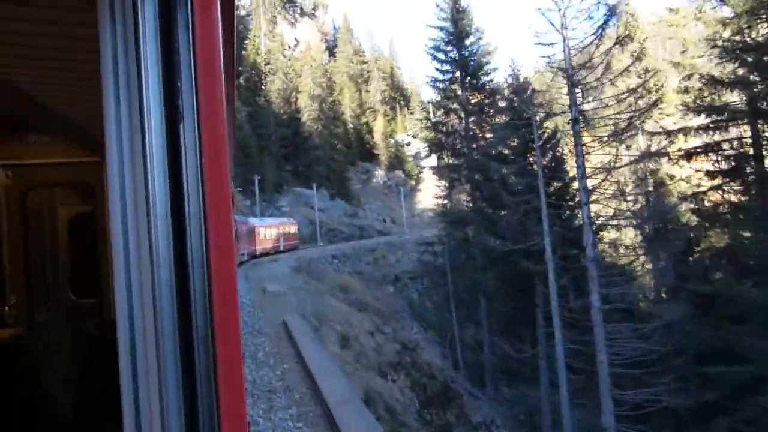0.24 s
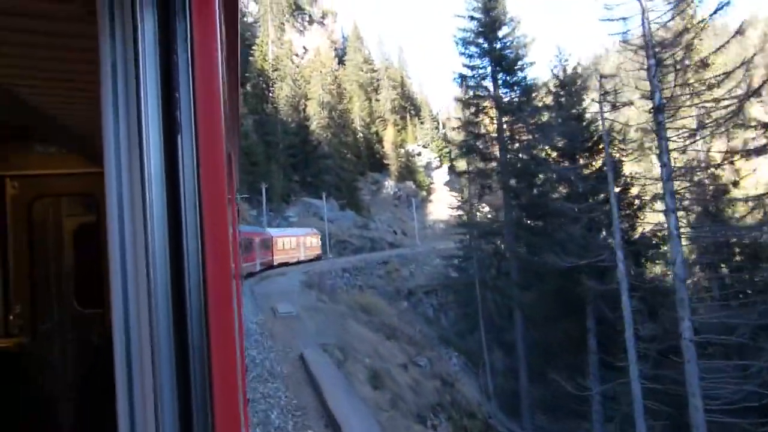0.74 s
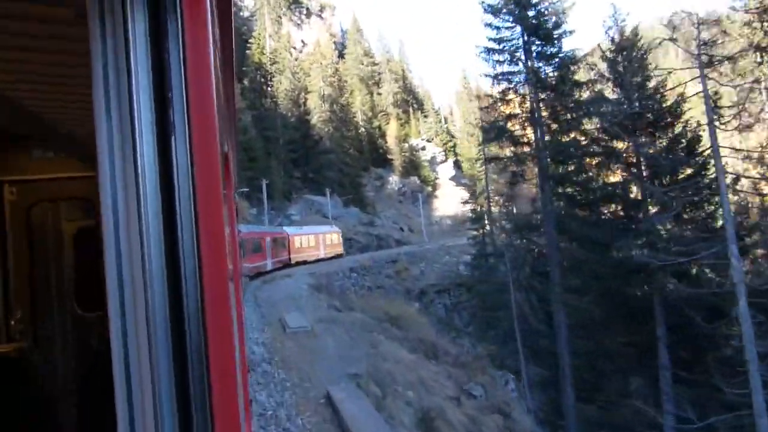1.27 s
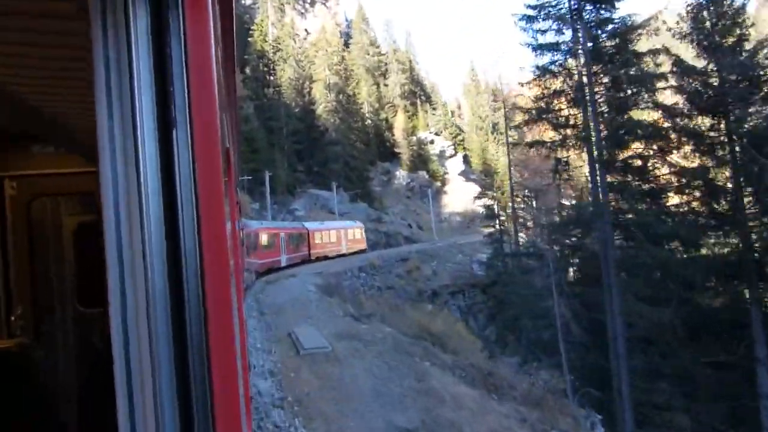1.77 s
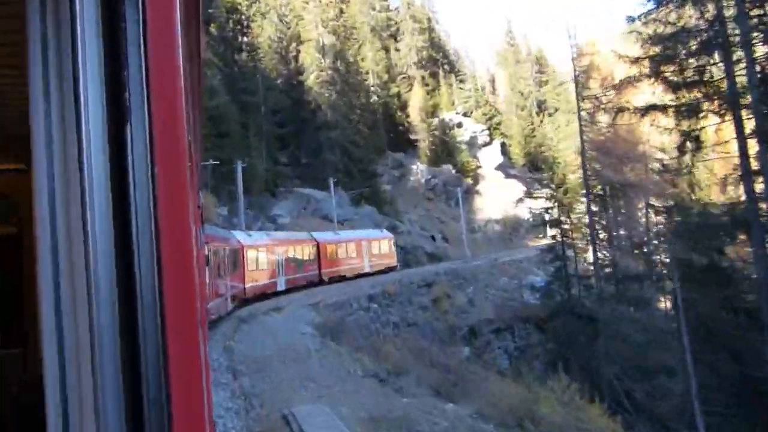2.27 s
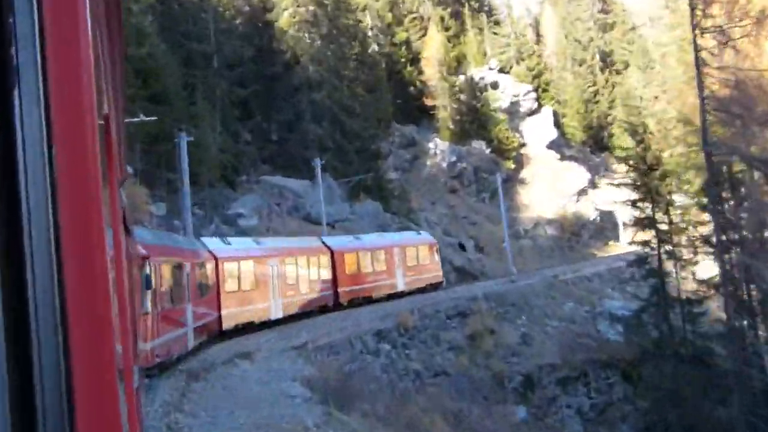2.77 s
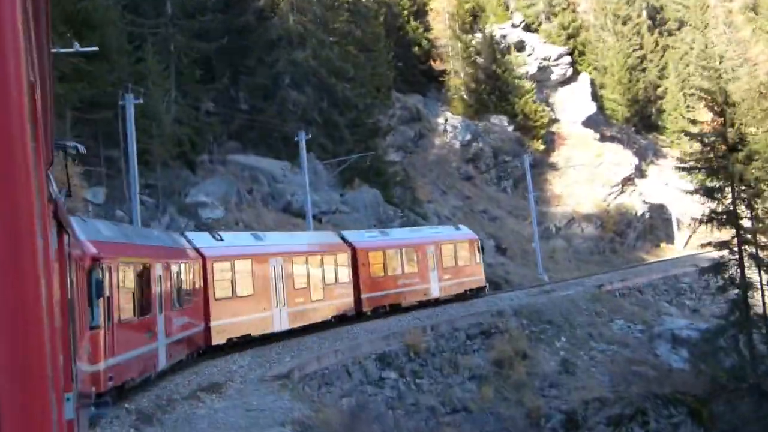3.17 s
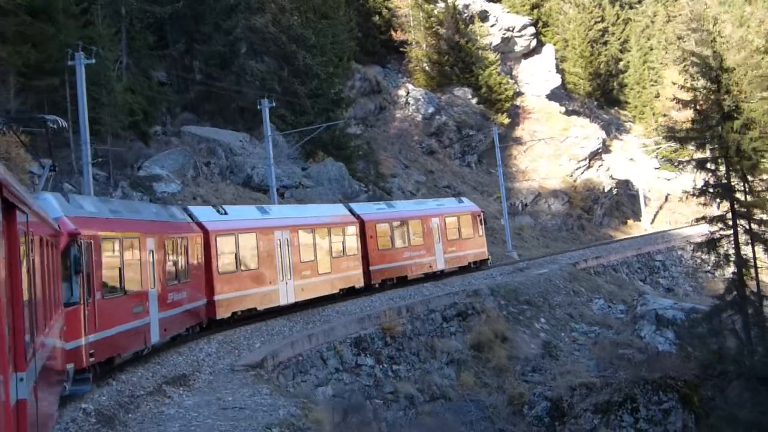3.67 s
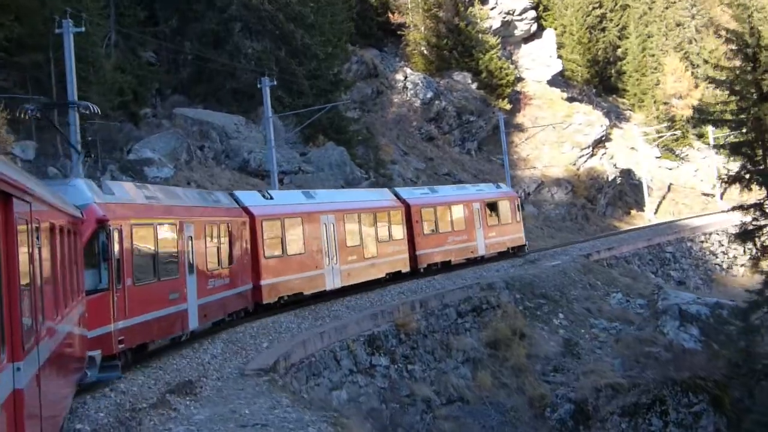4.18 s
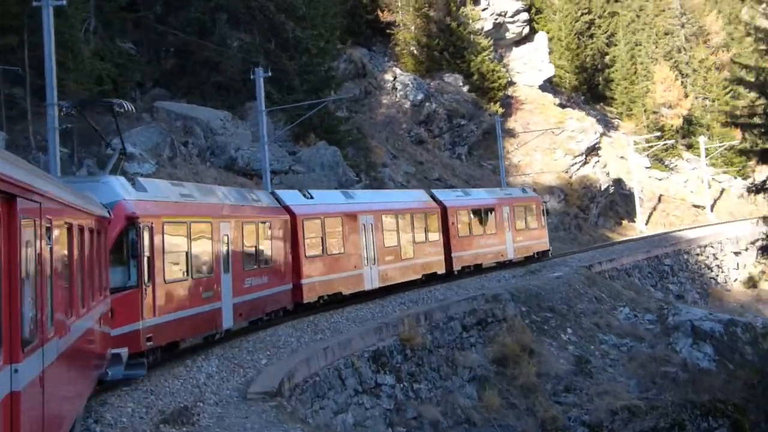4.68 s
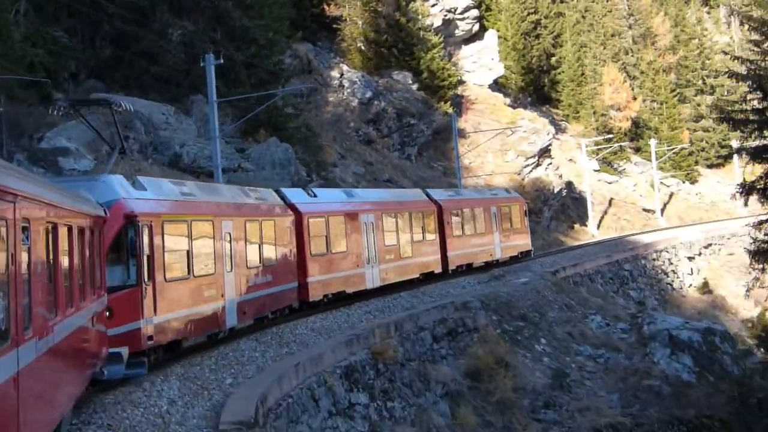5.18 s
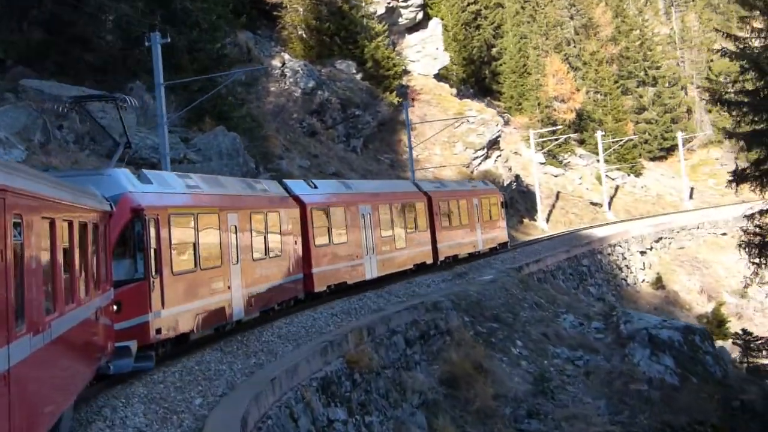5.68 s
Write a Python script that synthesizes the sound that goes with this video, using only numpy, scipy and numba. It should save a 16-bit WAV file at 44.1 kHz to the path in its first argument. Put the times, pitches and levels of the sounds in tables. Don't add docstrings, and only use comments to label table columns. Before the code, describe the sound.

At an open train window on a wooded curve, piercing wheel squeals ring over low rolling noise. A stuttering chirp comes at one and a half seconds, the shriek thins amid hard wind buffets, then higher tones join and the low one returns. Close stereo microphone, with wind thuds and brief dips in level.

```python
import sys
import numpy as np
from scipy import signal
from scipy.fft import rfft, irfft, next_fast_len
from scipy.io import wavfile
from scipy.ndimage import uniform_filter1d
from numba import njit

SR = 44100
rng = np.random.default_rng(int(sys.argv[2]) if len(sys.argv) > 2 else 0)


def wav_out(sig):
    wavfile.write(sys.argv[1], SR, np.round(np.clip(np.atleast_2d(sig).T, -1, 1) * 32767).astype(np.int16))


def field_ratio(decibels):
    return 10 ** (np.asarray(decibels, dtype=float) / 20)


N = 261513
T = np.arange(N) / SR
M = next_fast_len(N)
HZ = np.arange(M // 2 + 1) * SR / M

# [t/s, load level/dB, flange rub level/dB]
ROLL = [(0, -44.5, -91), (0.55, -44.5, -105), (0.9, -41, -90), (1.15, -46.5, -71), (1.35, -45, -64.5),
        (2.0, -44, -62), (2.4, -57.5, -74), (2.62, -60.5, -67.5), (2.9, -56, -77.5), (3.15, -47.5, -77.5),
        (3.5, -53, -94), (3.95, -49, -91), (4.3, -50.5, -98), (4.56, -44, -86), (4.95, -52, -73.5),
        (5.25, -46, -70.5), (5.6, -48, -77), (5.93, -44, -58)]
# [t/s, echo haze level/dB, direct tone over haze/dB]
LOW_WHEEL = [(0, -29.5, -11), (0.56, -29.5, -8.5), (0.7, -26.5, -13), (1.0, -23.5, -19), (1.15, -33, -23),
             (1.45, -23.5, -2.5), (1.8, -32, -3.5), (1.99, -30.5, 0.5), (2.2, -41, -6), (2.6, -80, 3),
             (3.2, -51.5, 3.5), (3.33, -31, -2), (3.8, -28.5, 3.5), (4.24, -22.5, 2.5), (4.6, -21.5, -8),
             (4.95, -29, -9), (5.6, -29, 3.5), (5.93, -39, 8.5)]
SECOND_WHEEL = [(0, -33.5, -11), (0.4, -30, -1), (0.558, -33, -5), (0.7, -28.5, 0.5), (1.0, -31.5, -8),
                (1.4, -37.5, -5), (1.55, -37, -0.5), (1.8, -35.5, -4), (2.2, -40, -16), (2.62, -38.5, 1),
                (3.14, -41, 3.5), (3.55, -46, 2), (3.85, -53.5, 12), (4.26, -69, -8), (4.96, -68, -6),
                (5.1, -52, -4), (5.6, -62, -4), (5.93, -57, -4)]
THIRD_WHEEL = [(0, -67, -15), (1.4, -56, -15), (1.55, -51, -12), (1.8, -38.5, -15), (1.99, -39, -8),
               (2.2, -37.5, -11), (2.6, -41, -5), (3.2, -26.5, -2.5), (3.55, -28.5, -10), (4.201, -26, 0),
               (4.55, -27.5, -18), (4.9, -39, -2), (5.05, -44.5, -10), (5.4, -52, -8), (5.93, -64, -8)]
HIGH_WHEEL = [(0, -49, -10), (1.0, -62, -5), (1.45, -52, -8), (2.2, -47, -3), (2.32, -42.5, 2),
              (2.6, -39, 1.5), (3.14, -35, 0.5), (3.55, -29, -2.5), (4.199, -29, -3), (4.6, -24.5, -3.5),
              (4.96, -35.5, -1.5), (5.27, -28, 0.5), (5.5, -27, -13), (5.7, -30, -9.5), (5.93, -33, -11)]
SONGS = [LOW_WHEEL, SECOND_WHEEL, THIRD_WHEEL, HIGH_WHEEL]
# [t/s, level/dB, f/Hz]
SLIPS = [
    (1.495, -12.5, 4220),
    (1.5142, -13, 4370),
    (1.5565, -20, 4440),
    (1.572, -14, 4326),
    (1.594, -12.5, 4340),
    (1.6134, -19, 4340),
    (1.6428, -14.5, 4270),
]


def curves(table):
    s, *columns = np.transpose(table)
    return [uniform_filter1d(np.interp(T, s, c), size=SR // 200) for c in columns]


def unit(x):
    return x / np.sqrt(np.mean(x ** 2))


def walk(rate):
    k = int(SR / rate)
    held = np.repeat(rng.standard_normal(N // k + 1), k)
    return unit(uniform_filter1d(uniform_filter1d(held, k), k)[:N])


def on_log(hz, points):
    f, value = np.transpose(points)
    return np.interp(np.log(hz + 1), np.log(f), value)


def noise(spectrum, flicker_db, rate):
    # [f/Hz, side minus mid level/dB]
    spread = [(100, -8), (700, -5.5), (2000, -6), (5000, -7), (12000, -2.5)]
    # [f/Hz, bandwidth/Hz, level/dB]
    body = [(690, 50, 5), (855, 40, 4), (925, 40, 5), (1230, 40, 3), (1390, 40, 3), (2130, 30, 4),
            (2900, 40, 3), (3660, 25, 7), (8900, 200, 5), (10600, 300, 4)]
    colour = field_ratio(on_log(HZ, [(15, -90)] + list(spectrum) + [(17000, -90)]))
    colour = colour * field_ratio(sum(db / (1 + (2 * (HZ - f) / w) ** 2) for f, w, db in body))
    white = rfft(rng.standard_normal((2, M))) * [colour, colour * field_ratio(on_log(HZ, spread))]
    out = 0
    for centre in np.arange(8, 29):
        band = np.clip(1 - abs(2 * np.log2(HZ + 1) - centre), 0, 1)
        if np.max(band * colour) > .03:
            out = out + field_ratio(flicker_db * walk(rate)) * irfft(white * band, M)[:, :N]
    return out / np.std(out[0])


def gain():
    # [t/s, depth level/dB, recovery t/s]
    ducks = [(0.029, 6, 0.27), (0.25, 8, .1), (0.488, 5, 0.16), (1.006, 9, 0.22), (1.101, 5, 0.16),
             (1.529, 2.5, 0.28), (2.029, 7.5, 0.19), (2.219, 7, 0.27), (2.36, 3.5, 0.27), (3.338, 7, 0.077),
             (3.599, 2.5, 0.14), (4.27, 2, 0.13), (4.88, 0, .12), (5.35, 2, 0.13)]
    attack_s, climb = 0.0051, 2.23
    total_db = 0
    for s, depth_db, climb_s in ducks:
        late = np.maximum(T - s, 0)
        total_db = total_db + depth_db * np.minimum(late / attack_s, 1) * np.exp(-(late / climb_s) ** climb)
    return -total_db


def wind():
    # [t/s, level/dB, length t/ms]
    hard_gusts = [(0.031, -25, 39), (0.16, -28, 27), (0.225, -30, 35), (0.263, -28, 60), (0.49, -28.5, 82),
                  (0.964, -30, 65), (1.016, -26, 59), (1.102, -18, 49), (1.197, -27.5, 33),
                  (1.739, -29, 38), (2.023, -21.5, 19), (2.065, -24.5, 27.5), (2.125, -29.5, 43),
                  (2.208, -25, 44), (2.342, -22, 20), (2.368, -19, 22), (2.395, -24.5, 17),
                  (2.475, -25.5, 17), (2.51, -25, 21), (2.622, -27, 60), (2.765, -26.5, 69),
                  (3.264, -30.5, 30), (3.33, -27.5, 27), (3.563, -27.5, 90), (3.647, -28.5, 43),
                  (4.895, -26, 35), (4.95, -32, 35)]
    # [t/s, level/dB]
    puffs = [(0.085, -33), (0.584, -32), (0.899, -33), (1.446, -52), (1.529, -30.5), (1.937, -39),
             (2.684, -32), (2.948, -27), (3.174, -32.5), (3.372, -30.5), (3.76, -36), (3.963, -31),
             (4.29, -39), (4.64, -34), (4.687, -29.5), (4.78, -30), (5.258, -32.5), (5.336, -36),
             (5.42, -37.5), (5.62, -29.5), (5.797, -35)]
    # [f/Hz, level/dB per Hz]
    wind_spectrum = [(18, -98), (30, -53.5), (142, -5), (279, -5), (486, -13), (762, -24.5), (1040, -36.5),
                     (4000, -68), (5200, -113), (8800, -120)]
    # [f/Hz, level/dB]
    leak_tilt = [(40, 21), (120, 5.5), (300, -3.5), (1000, 6.5)]
    puff_ms, wake_s, leak_db = 48, .1, -17.5
    calm_db, wake_db = -57, -7
    split_hz, bright_db, even_db = 270, 0.28, -33

    rows = hard_gusts + [(s, db, puff_ms) for s, db in puffs]
    gusts = sum(field_ratio(db) ** 2 * np.exp(-(5000 * (T - s) / ms) ** 2 / 2.9) for s, db, ms in rows)
    k = int(wake_s * SR)
    wake = uniform_filter1d(uniform_filter1d(gusts, k), k)
    power = gusts + field_ratio(calm_db) ** 2 + field_ratio(wake_db) ** 2 * wake

    white = rfft(rng.standard_normal((2, M))) * field_ratio(on_log(HZ, wind_spectrum))
    white[0] *= field_ratio(on_log(HZ, leak_tilt))
    low = irfft(white / (1 + (HZ / split_hz) ** 2), M)[:, :N]
    high = irfft(white / (1 + (split_hz / (HZ + 1)) ** 2), M)[:, :N]
    tilt = field_ratio(bright_db * (10 * np.log10(power) - even_db))
    eddies = (low / tilt + high * tilt) * field_ratio(3.1 * walk(60))
    eddies = eddies / np.sqrt(uniform_filter1d(eddies ** 2, int(0.03 * SR)))
    return np.sqrt(power) * eddies * [[field_ratio(leak_db)], [1]]


def rail():
    # [t/s, f/Hz]
    hum_pitch = [(0, 456), (1.9, 451), (3.9, 445.7), (4.4, 439), (5.6, 427.5), (5.93, 413.5)]
    # [t/s, level/dB, length t/s]
    swells = [(0.726, -44, 0.095), (0.85, -31, 0.082), (1.312, -41.5, 0.09), (1.475, -38.5, 0.072),
              (1.684, -36, 0.055), (1.933, -42, 0.088), (2.166, -41.5, .05), (2.55, -51, 0.15),
              (3.1, -40.5, 0.085), (3.27, -40.5, 0.058), (3.48, -42, 0.063), (3.9, -47, 0.028),
              (5.895, -37, 0.096)]
    # [t/s, level/dB, f/Hz, decay by 60 dB t/s]
    booms = [
        (4.419, -41, 219, 0.28),
        (4.531, -39.5, 190.8, 0.3),
        (5.065, -38, 202, 0.15),
        (5.309, -38.5, 208, 0.19),
        (5.709, -32.5, 202, 0.12),
        (3.86, -45.5, 196, 0.22),
    ]
    width_hz, rise_s, overtone_db = 20.7, 0.02, -15.5

    (hz,) = curves(hum_pitch)
    steady = field_ratio(-52 + 0.48 * (curves(ROLL)[0] + 49.5))
    swelling = sum(field_ratio(db) * np.exp(-((T - s) / long_s) ** 2) for s, db, long_s in swells)
    level = field_ratio(gain()) * (steady + swelling)

    k = int(SR / width_hz / 2)
    rough = uniform_filter1d(uniform_filter1d(rng.standard_normal((4, N)), k), k)
    turn = 2 * np.pi * np.cumsum(hz) / SR
    mid = unit((rough[0] + 0.9 * rough[0].std()) * np.sin(turn) + rough[1] * np.cos(turn))
    side = 0.5 * unit(rough[2] * np.sin(turn) + rough[3] * np.cos(turn))
    out = level * field_ratio(-1.5) * np.array([mid, side])
    overtone = unit(rough[2] * np.sin(2 * turn) + rough[3] * np.cos(2 * turn))
    out[0] += level * field_ratio(overtone_db) * overtone

    for s, db, boom_hz, t60 in booms:
        t = np.maximum(T - s, 0)
        envelope = (1 - np.exp(-t / rise_s)) * np.exp(-np.log(1000) * t / t60)
        out[0] += field_ratio(db + 11.5) * envelope * np.sin(2 * np.pi * (boom_hz * t + 0.092 * walk(49)))
    return out


def rolling():
    # [f/Hz, level/dB per Hz]
    roar_spectrum = [(60, -37), (120, -14), (200, -5.5), (450, -2), (950, -7), (1100, -12.5), (1500, -25.5)]
    rasp_spectrum = [(700, -23), (1100, -2.5), (1600, -3), (2500, -6), (3300, -4.5), (4000, 0),
                     (6000, -20.5), (7500, -21)]
    grind_spectrum = [(2600, -30), (4500, 2.5), (7000, -0.5), (8800, -2.5), (9800, -9.5), (10800, -13.5),
                      (11600, -61)]
    air_spectrum = [(9500, -21), (11000, -3), (13000, -10), (14000, -13), (15000, -26)]
    self_spectrum = [(20, -9), (35, -16), (55, -20), (100, -1)]
    floor_levels = [-57.5, -84, -80]

    load_db, rub_db = curves(ROLL)
    gain_db = gain()
    others = sum(field_ratio(curves(song)[0]) for song in SONGS[1:])
    song_hiss = field_ratio(-28) * (field_ratio(curves(LOW_WHEEL)[0]) + field_ratio(-8) * others)
    hiss = field_ratio(-60.5 + .45 * (load_db + 46.5)) + field_ratio(rub_db + 11.5) + song_hiss
    levels = field_ratio(-46 + 1.09 * (load_db + 47.5)), field_ratio(load_db), hiss
    roar, rasp, grind = (np.hypot(field_ratio(gain_db) * level, field_ratio(floor_db))
                         for level, floor_db in zip(levels, floor_levels))

    out = roar * field_ratio(1.5) * noise(roar_spectrum, flicker_db=1.34, rate=9)
    out = out + rasp * field_ratio(2.0) * noise(rasp_spectrum, flicker_db=2.16, rate=7.4)
    out = out + grind * field_ratio(2.5) * noise(grind_spectrum, flicker_db=1.5, rate=13)
    out = out + field_ratio(rub_db + gain_db + 7.5) * noise(air_spectrum, flicker_db=5.5, rate=14)
    return out + field_ratio(-60.5) * noise(self_spectrum, flicker_db=-6.0, rate=5.7)


def grip():
    grip_s, share = .005, .7
    return np.prod([1 - share * np.exp(-((T - s + grip_s) / grip_s) ** 4) for s, _, _ in SLIPS], axis=0)


def slips():
    rise_s, spread_s = 0.0023, 0.0028
    return sum(field_ratio(db - 4.0) * np.exp(-((T - s - rise_s) / spread_s) ** 2) * np.sin(2 * np.pi * hz * T)
               for s, db, hz in SLIPS)


def tone(hz):
    wander_hz, shiver_db = 2.494, 3.0
    phase = 2 * np.pi * np.cumsum(hz + wander_hz * walk(3.0)) / SR
    return np.sqrt(2) * field_ratio(shiver_db * walk(24.774)) * np.sin(phase)


@njit
def echoes(start, step, sweep, phase, left, right, size, total):
    out = np.zeros((2, total + size))
    for k in range(len(start)):
        z, p, glide = np.exp(1j * phase[k]), np.exp(1j * step[k]), np.exp(1j * sweep[k])
        w, turn = 1 + 0j, np.exp(2j * np.pi / size)
        for i in range(start[k], start[k] + size):
            v = z.imag * (1 - w.real)
            out[0, i] += left[k] * v
            out[1, i] += right[k] * v
            z, p, w = z * p, p * glide, w * turn
    return out


def forest(hz):
    # [shift in units of 2 v / c, level/dB]
    trees = [(-1.6, -24), (-1.66, -21), (-0.58, -6), (-0.68, -1), (-1.17, -0.5), (0.59, 3.5), (0.87, -3.5),
             (1.09, -5.5), (1.44, -19.5), (2.6, -22)]
    speed, tree_rate, tree_s = 8.5, 2200, .04
    glide = .12
    scatter_db, wide_db = 1.5, 4.0
    size = int(tree_s * SR)
    count = int(tree_rate * (N + size) / SR)
    u = rng.random((count, 5)).T
    start = (u[0] * (N + size)).astype(np.int64)
    along = 2 * (2 * u[1] - 1)
    doppler = 2 * speed / 343
    step = 2 * np.pi * hz / SR
    first_step = step * (1 + doppler * (along + glide / 2))
    sweep = np.full(count, -step * doppler * glide / size)
    strength = field_ratio(np.interp(along, *np.transpose(trees)) - scatter_db * np.log(1 - u[2]))
    pan = field_ratio(wide_db * (2 * u[3] - 1))
    out = echoes(start, first_step, sweep, 2 * np.pi * u[4], strength * pan, strength / pan, size, N + size)
    out = out[:, size:N + size]
    return out / np.std(out.mean(axis=0))


def squeal():
    modes = [
        4345,
        5275,
        6038,
        7295,
    ]
    # [t/s, haze level/dB, direct tone level/dB]
    treble_song = [
        (3.2, -65, -75),
        (3.98, -43.5, -55.5),
        (4.486, -63, -69),
        (4.678, -82, -85),
        (4.7, -87, -77),
    ]
    # [t/s, left minus right level/dB]
    place = [(0, -2), (1.5, -1.5), (2.5, 1), (4, 0.5), (5.93, 0.5)]
    treble_hz = 10568

    songs, (pan_db,) = [curves(song) for song in SONGS], curves(place)
    out = field_ratio(songs[0][0] - 28) * forest(2 * modes[0])
    for hz, (wet_db, over_db) in zip(modes, songs):
        out = out + field_ratio(wet_db - 2.0 + 0.92 * walk(12)) * forest(hz)
        out = out + field_ratio(wet_db + over_db - 3.5) * tone(hz)
    out = out + field_ratio(songs[1][0] - 36.5) * forest(2 * modes[1])
    out = out * grip()

    silent_before = (treble_song[0][0] - .3, -95, -95)
    silent_after = (treble_song[-1][0] + .2, -95, -95)
    wet_db, dry_db = curves([silent_before, *treble_song, silent_after])
    out = out + field_ratio(wet_db) * forest(treble_hz) + field_ratio(dry_db + 5.5) * tone(treble_hz)
    return (out + slips()) * field_ratio(gain() + np.array([pan_db, -pan_db]) / 2)


def scene():
    left_db = 1
    mid, side = rolling() + rail() + wind()
    low = np.array([mid + side, mid - side]) * field_ratio(np.array([[-left_db], [left_db]]) / 2)
    return low + squeal()


def roll_off(x):
    return signal.sosfilt(signal.butter(12, 15300, fs=SR, output="sos"), x)


def record(dry):
    mix = dry - .0031
    return roll_off(mix)


dry = scene()
out = record(dry)
wav_out(out)
```